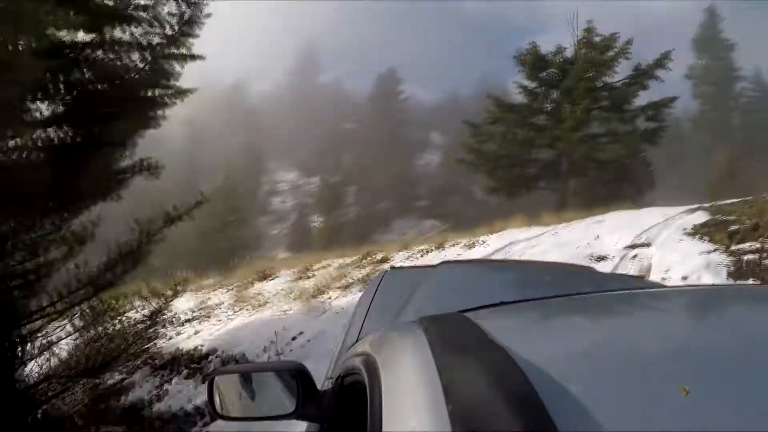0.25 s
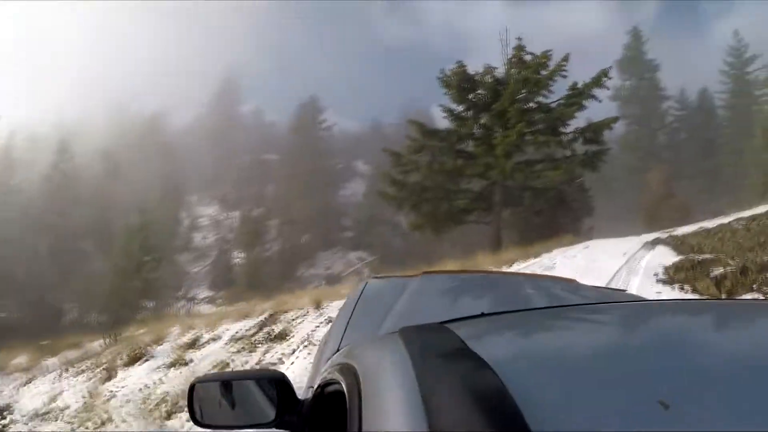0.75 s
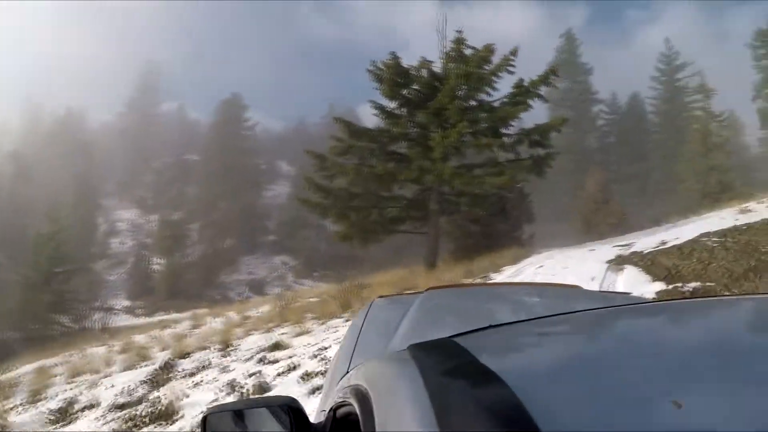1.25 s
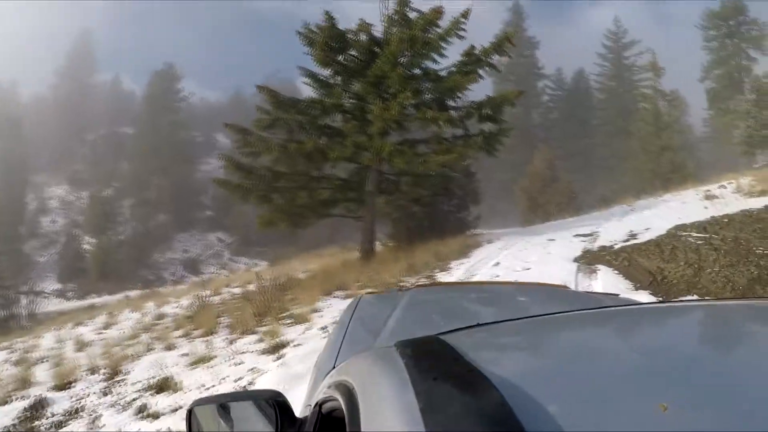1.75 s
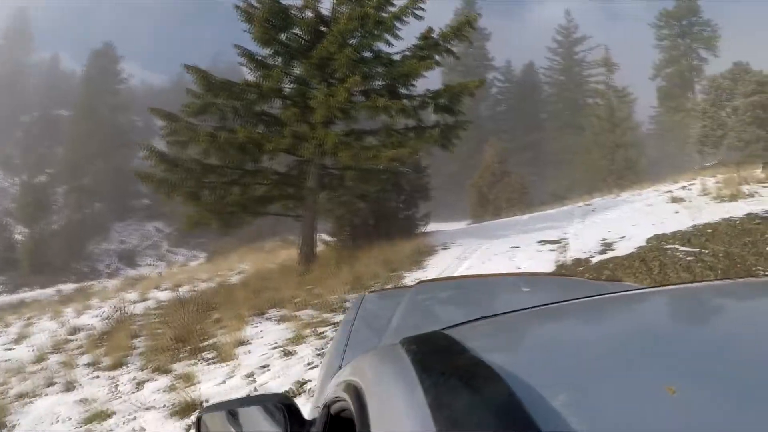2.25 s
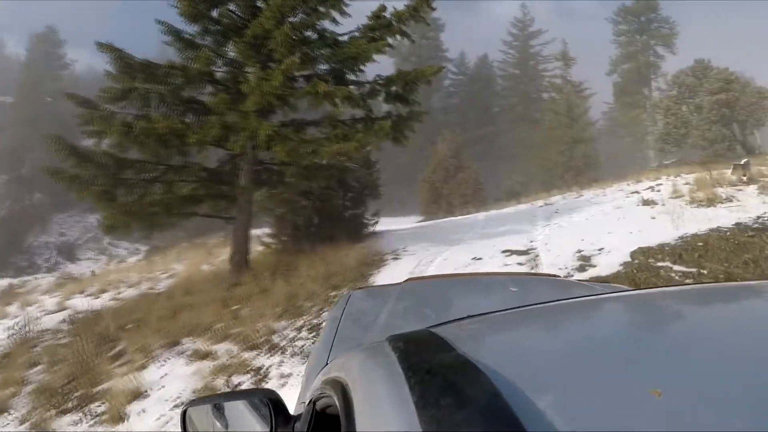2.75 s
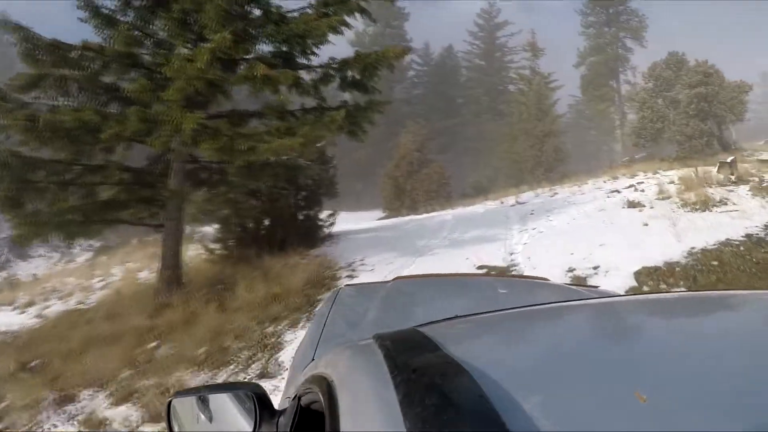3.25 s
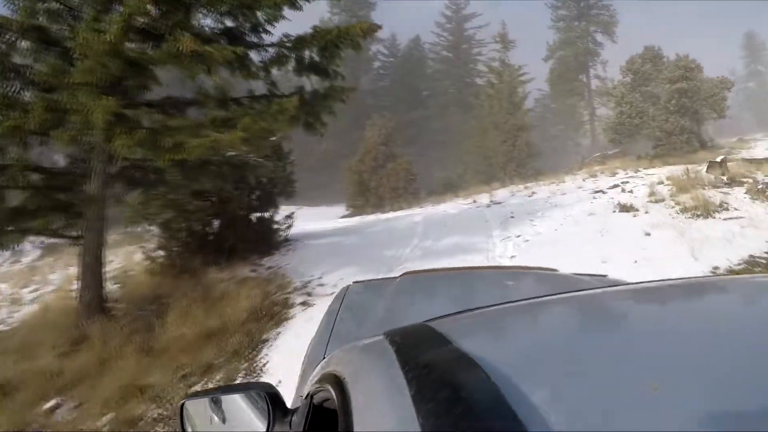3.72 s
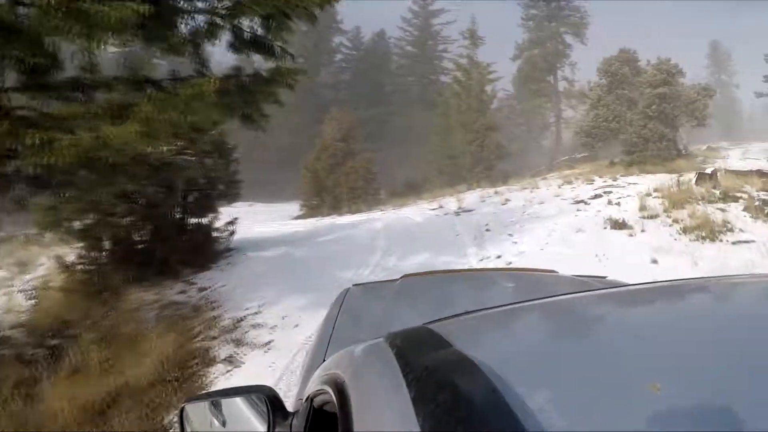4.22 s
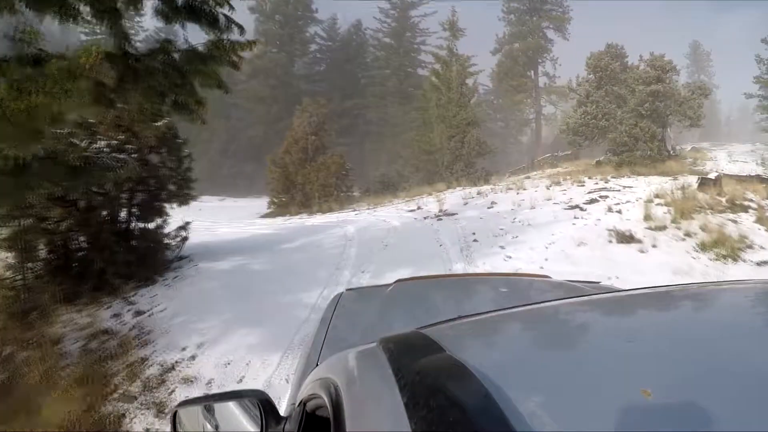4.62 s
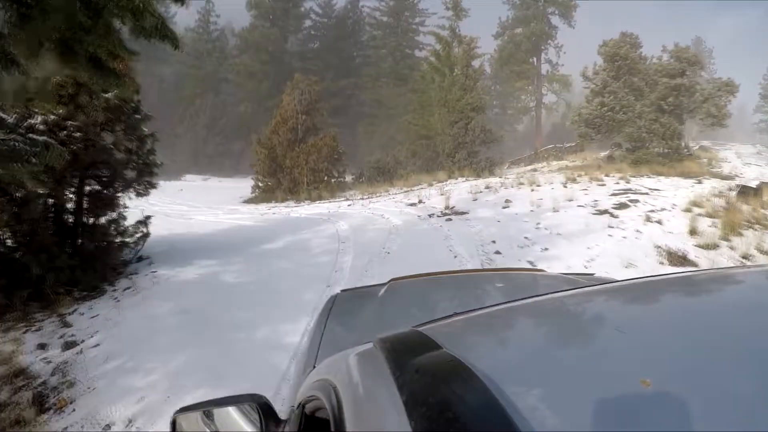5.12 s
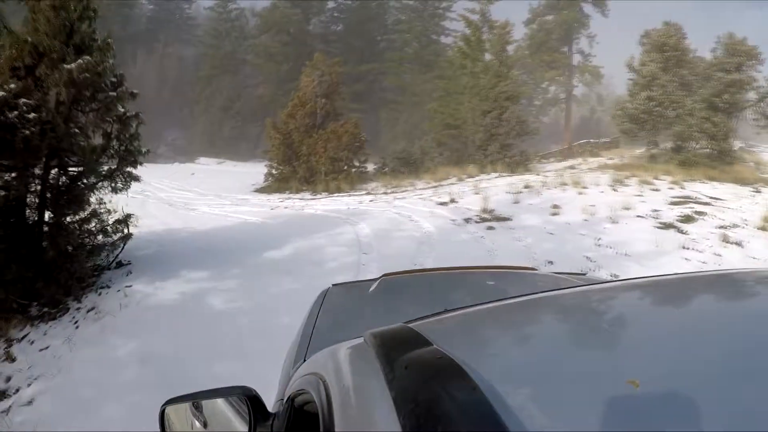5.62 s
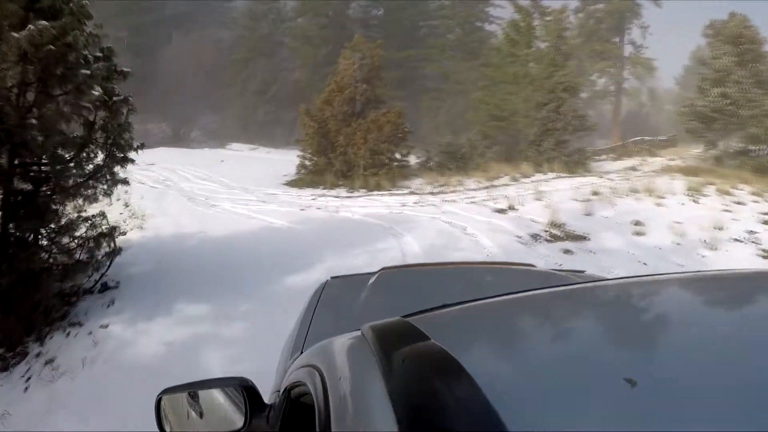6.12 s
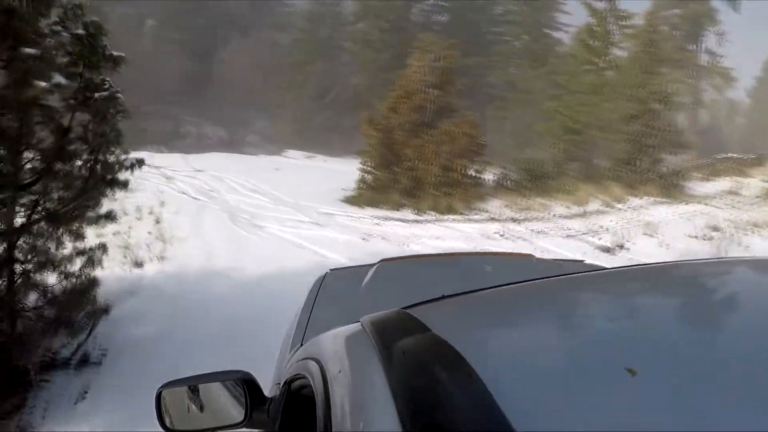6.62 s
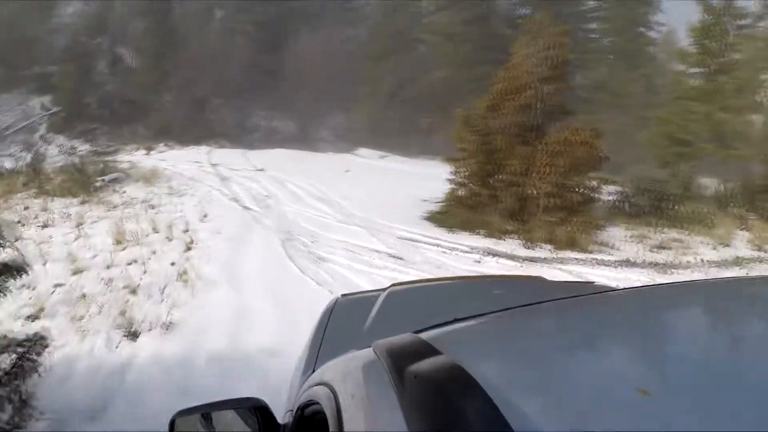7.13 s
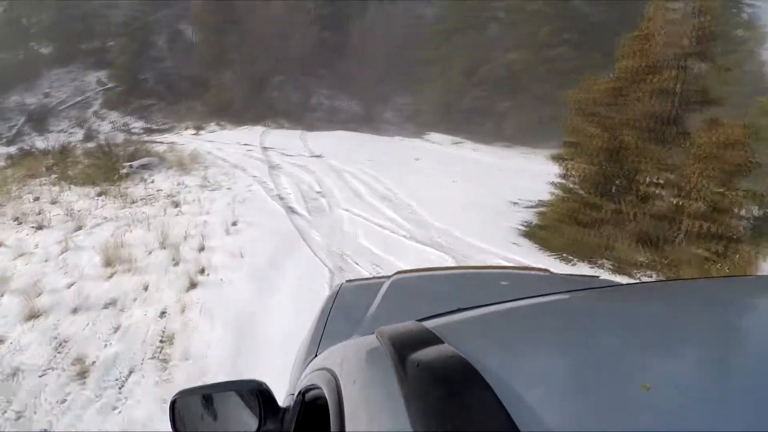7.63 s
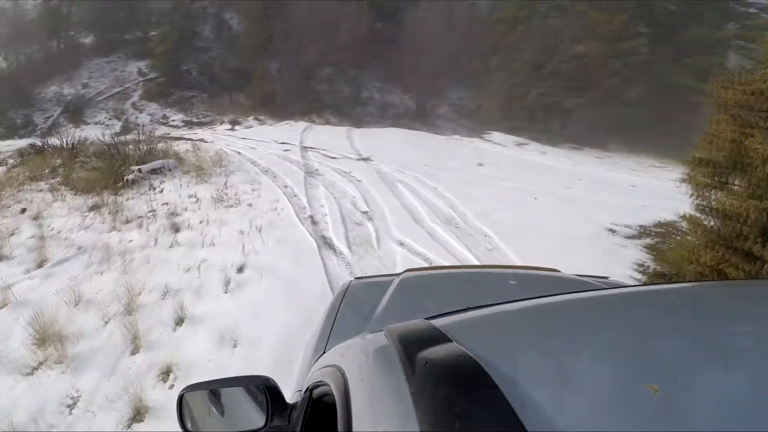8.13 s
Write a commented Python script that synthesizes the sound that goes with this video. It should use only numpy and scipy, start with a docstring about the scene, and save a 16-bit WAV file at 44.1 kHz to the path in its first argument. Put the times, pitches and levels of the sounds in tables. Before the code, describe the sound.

A car climbs a rough, snow-covered track, heard close up from a microphone on its roof. The exhaust throbs low while the body rumbles and booms over ruts, tyres crunch snow and air hisses past. The suspension knocks irregularly and bits of grit tick on the panels. After a calmer middle stretch the engine pulls harder and rises in pitch, then eases off amid more knocks and a faint thin whistle.

```python
"""A car climbs a rough, snowy track, heard close up from a small camera's microphone on its roof.
From the start the exhaust throbs with each firing, the body rumbles over ruts and booms in swells,
tyres crunch snow, air and spray hiss past and the suspension knocks. Grit starts ticking on the panels
near 1 s; icy crust crackles from about 2 to 3 s. At 6 s the engine pulls hard and air rushes in its
intake; from 7 s a thin whistle falls as the car slows."""
import sys
import numpy as np
from scipy import signal
from scipy.fft import rfft, irfft, next_fast_len
from scipy.io import wavfile
from scipy.ndimage import uniform_filter1d, map_coordinates

SR = 44100
rng = np.random.default_rng(int(sys.argv[2]) if len(sys.argv) > 2 else 0)


def generate_wav(sig):
    """Save sig (samples, or channels by samples) to the path in sys.argv[1] as 16-bit PCM at SR."""
    pcm = np.round(np.clip(np.atleast_2d(sig).T, -1, 1) * 32767).astype(np.int16)
    wavfile.write(sys.argv[1], SR, pcm)


N = 369116

# engine speed: time_s, firing_hz
ENGINE_SPEED = [(0, 48.2), (.09, 47.8), (.37, 51.5), (.79, 44.6), (1.02, 51.6), (1.33, 43.6), (1.56, 34.6),
                (1.75, 35), (1.91, 29.6), (2.12, 31.4), (2.33, 35.8), (2.56, 29.8), (3.01, 33.5),
                (3.28, 33.3), (3.66, 37.6), (3.82, 36.5), (4.05, 38.1), (4.17, 40.8), (4.34, 39.4),
                (4.5, 40), (4.92, 35.8), (5.29, 37.9), (5.59, 34.8), (5.78, 36.4), (5.9, 35.9),
                (6.08, 39.3), (6.45, 48.5), (6.67, 56.5), (6.95, 59), (7.39, 64), (7.78, 57.8), (8, 44.8),
                (8.37, 43.7)]
# engine load: time_s, firing_tone_db, octave_db, upper_overtones_db, pipe_ring_db
ENGINE_LOAD = [(0, -30, -33, -36, 0), (.3, -30, -34, -41, 0), (.55, -28, -28, -35, -7),
               (.75, -26, -31, -31, -9), (.95, -26, -27, -35, -8), (1.15, -28, -33, -42, 0),
               (1.45, -32, -34, -42, 0), (1.65, -24, -19, -37, 0), (1.9, -25, -23, -34, 0),
               (2.3, -26, -25, -32, 0), (2.6, -26, -28, -34, 0), (2.9, -26, -26, -31, 0),
               (3.4, -25, -25, -34, 2), (3.7, -24, -23, -38, 0), (4.05, -24, -23, -35, 0),
               (4.16, -23, -18, -33, 5), (4.3, -21, -25, -35, 4), (4.75, -23, -25, -37, 2),
               (4.95, -25, -27, -41, 0), (5.25, -28, -35, -41, 0), (5.5, -28, -26, -37, 0),
               (5.9, -22, -21, -35, 0), (6.08, -24, -19, -27, 7), (6.25, -23, -17, -28, 12),
               (6.45, -21, -18, -27, 13), (6.6, -19, -18, -25, 5), (6.72, -19, -21, -31, 3),
               (6.85, -23, -31, -39, 0), (7.35, -23, -29, -38, 0), (7.7, -24, -35, -40, 0),
               (8.1, -28, -33, -36, 0), (8.37, -30, -33, -38, 0)]
# colour the exhaust gives the upper overtones: frequency_hz, gain_db
EXHAUST_COLOUR = [(90, 1), (112, -2), (130, -2), (168, -3), (186, -10), (205, -13), (230, -5), (255, -10),
                  (275, -13), (295, -12), (325, -21), (380, -13), (450, -23), (560, -17), (640, -32)]
# faint tones of the running car: pitch_hz, level_db
WHINE_TONES = [(646, -78), (3530, -76.5)]
# swells of the shell's deep boom, from ruts or from beating with the engine: peak_s, boom_db
BOOM_SWELLS = [(.07, -18.5), (.27, -21), (0.49, -26), (0.769, -14.5), (1.04, -13), (1.2, -20.5),
               (1.45, -17), (1.72, -31), (3.75, -32), (3.92, -36), (4.33, -21), (4.5, -19.5), (4.86, -25),
               (5.2, -25), (5.55, -26), (5.8, -17.5), (6.05, -17), (6.33, -17), (6.54, -17.5), (6.83, -16),
               (6.95, -22), (7.13, -43), (7.35, -25), (7.76, -24), (7.98, -32), (8.18, -25)]
# roughness of the track: time_s, rumble_db
ROUGHNESS = [(0, -28.5), (.25, -19), (.6, -21.5), (1.0, -24.5), (1.37, -16.5), (1.9, -23.5), (2.6, -30.5),
             (3.3, -29.5), (3.9, -24), (4.12, -19), (4.45, -28.5), (5.1, -20), (5.5, -24), (6.1, -24),
             (6.6, -21.5), (7.1, -14.5), (7.7, -17.5), (8.37, -20.5)]
# rumble of the shell under the microphone: frequency_hz, relative_db
RUMBLE_SPECTRUM = [(8.8, -29), (15, -0.5), (32, 1), (53, 1.5), (76, 1), (113, -3.5), (155, -14),
                   (254, -21.5), (292, -20.5), (349, -26), (400, -31.5), (520, -36.5), (880, -120)]
# tyres and air: time_s, crunch_db, hiss_db, crunch_bass_gain_db
SNOW_LEVELS = [(0, -25.5, -50, -8.5), (.65, -30.5, -51.5, -0.5), (.93, -26, -51, -8.5),
               (1.17, -24.5, -44.5, -6), (1.44, -32, -54, -9.5), (2.1, -34, -52.5, 3.5),
               (3.3, -33, -52.5, -4.5), (3.8, -31.5, -53.5, 1.5), (4.54, -30, -51, -1),
               (4.87, -32, -54, -1.5), (5.52, -35, -56, 4), (5.97, -32.5, -51.5, 4.5), (6.25, -27, -50, -2),
               (6.64, -25.5, -47, 1), (6.85, -26.5, -49.5, -2.5), (7.15, -29, -52, 4),
               (7.45, -30.5, -51.5, -2.5), (8.37, -32.5, -53.5, -0.5)]
# snow packing under the tyres: frequency_hz, relative_db
CRUNCH_SPECTRUM = [(88, -16.5), (150, -1.5), (200, -8.5), (248, -5.5), (299, -15), (361, -14), (658, -18),
                   (701, -21.5), (846, -20), (1520, -30.5), (3000, -44), (3900, -48), (6600, -120)]
# air and spray passing the roof: frequency_hz, relative_db
HISS_SPECTRUM = [(880, -46), (1500, -4.5), (1670, 0), (2170, -1.5), (2920, -6), (3310, -7), (3610, -2.5),
                 (5190, -10), (5960, -10), (7040, -18.5), (8500, -21), (11000, -34), (18700, -120)]
# knocks in the suspension and trim: start_s, ring_db, centre_hz, crack_db
KNOCK_BLOWS = [(.050, -13, 1040, -18.5), (.269, -26.5, 355, -23), (.958, -24.5, 355, -36),
               (1.058, -28, 355, -25), (1.078, -18, 850, -17), (1.097, -22.5, 355, -20),
               (1.067, -21, 610, -22), (1.088, -26, 645, -22), (1.107, -28, 900, -32),
               (1.118, -26, 560, -17), (1.128, -32, 735, -35), (1.195, -25, 500, -28),
               (1.21, -30, 475, -31), (1.225, -26, 600, -24), (1.27, -24, 355, -33),
               (1.286, -19.5, 860, -20), (1.34, -28.5, 355, -43), (1.398, -25, 552, -27),
               (1.504, -21, 473, -29), (2.225, -19, 552, -21), (2.451, -28, 820, -22),
               (2.757, -22, 500, -24), (3.285, -23, 447, -25), (3.293, -21, 505, -32),
               (3.454, -22, 423, -28), (3.778, -25, 690, -34), (4.481, -35, 265, -33),
               (4.961, -23, 475, -33), (4.97, -17.5, 266, -33), (5.095, -23, 486, -34),
               (5.895, -21, 268, -42), (6.600, -11.5, 268, -32), (6.631, -17, 637, -31),
               (7.018, -23.5, 1240, -30), (7.037, -24, 955, -26), (7.098, -22, 1180, -28),
               (7.108, -27, 1250, -35), (7.116, -26, 1100, -34), (7.128, -29, 900, -19.5),
               (7.151, -25, 420, -30), (7.159, -23, 414, -31), (7.287, -17, 1050, -22),
               (7.505, -16.5, 268, -33), (7.534, -30.5, 355, -33), (7.554, -19, 410, -22),
               (7.628, -19, 268, -26), (7.809, -17, 473, -23), (7.868, -27, 410, -23),
               (8.182, -24.5, 422, -41)]
# modes of the suspension and trim: pitch_hz, t60_s
TRIM_MODES = [(268, 0.068), (355, 0.17), (410, 0.065), (475, 0.044), (552, 0.046), (650, 0.031),
              (735, 0.053), (880, 0.05), (1090, 0.022), (1180, 0.038), (1300, 0.039)]
# crack of a knock: frequency_hz, relative_db
THUD_SPECTRUM = [(120, -16), (260, -6), (600, -14), (1300, -20.5), (2000, -32.5), (5000, -49), (9000, -120)]
# grit striking the panels: start_s, ring_db, centre_hz, crack_db
GRIT_BLOWS = [(.807, -54, 5540, -47), (1.113, -46, 6140, -39), (1.156, -30, 3650, -31.5),
              (1.501, -30.5, 2150, -37), (1.811, -46, 3750, -51), (1.935, -49, 6140, -46),
              (2.042, -50, 4200, -49), (2.053, -44, 3400, -41), (2.2, -48, 4400, -50),
              (2.561, -48, 5800, -46), (2.697, -48, 4400, -50), (2.889, -47, 6140, -47),
              (2.221, -45, 4200, -33), (2.753, -50, 3650, -36.5), (5.427, -49, 3000, -48),
              (5.708, -42, 2930, -39.5), (6.323, -36, 1820, -46), (7.109, -46, 3460, -44),
              (8.219, -42, 3700, -55)]
# modes of the panels: pitch_hz, t60_s
PANEL_MODES = [(1820, 0.05), (2190, 0.047), (2980, 0.028), (3500, 0.06), (3750, 0.026), (3950, 0.049),
               (4200, 0.048), (5540, .03), (6140, 0.044)]
# crack of grit: frequency_hz, relative_db
TICK_SPECTRUM = [(900, -36), (1800, 3), (2500, -1.5), (4200, -1), (6300, -11.5), (7600, -21), (12000, -84)]
# a stretch of icy crust: time_s, level_db
CRUST_LEVELS = [(0, -85), (1.6, -80), (1.85, -63.5), (2.95, -63.5), (3.3, -75), (8.37, -85)]
# grains of crust: frequency_hz, relative_db
CRUST_SPECTRUM = [(2000, -48), (3300, -17), (4500, -3), (6300, 3.5), (7200, -25), (11000, -65)]
# air drawn into the engine: time_s, level_db
INTAKE_LEVELS = [(0, -55), (3.6, -56), (4.3, -51), (4.9, -56), (5.8, -55), (6.15, -45), (6.9, -45),
                 (7.25, -52), (8.37, -57)]
# resonances of the air duct: frequency_hz, relative_db
INTAKE_SPECTRUM = [(800, -40), (1120, -9), (1190, 0), (1260, -8), (1310, -2), (1390, -10), (1520, 0),
                   (1660, -9), (1760, -4), (1880, -13), (2020, -18), (2130, -6), (2300, -16), (2440, -11),
                   (3200, -45)]
# whistle as the car slows: time_s, pitch_hz, level_db
WHISTLE_GLIDE = [(7.0, 2740, -85), (7.12, 2720, -63), (7.3, 2700, -69), (7.52, 2660, -63),
                 (7.85, 2600, -67), (8.05, 2500, -72), (8.15, 2690, -72), (8.37, 2650, -66)]
# the microphone's own noise: frequency_hz, relative_db
MIC_NOISE_SPECTRUM = [(3530, -7), (6000, 1.5), (8030, -3.5), (10400, -1), (13200, -13), (15000, -13)]


def amp(db):
    """Gain of a level in dB."""
    return 10 ** (np.asarray(db) / 20)


def unit_rms(x):
    """x at rms 1."""
    return x / np.sqrt(np.mean(x ** 2) + 1e-20)


def db_at(spectrum, hz):
    """Level of a spectrum at hz, interpolated on a log frequency axis."""
    points_hz, db = np.transpose(spectrum)
    return np.interp(np.log(hz + 1), np.log(points_hz + 1), db)


def curves(rows):
    """One value per sample for each column after the time."""
    time_s, *columns = np.transpose(rows)
    return [np.interp(np.arange(N) / SR, time_s, column) for column in columns]


def wobble(rate_hz):
    """A smooth random curve through rate_hz knots a second, 30 at most."""
    coarse = np.arange(0, N + 32, 32)
    knots = rng.standard_normal(int(N * 30 / SR) + 4)
    return np.interp(np.arange(N), coarse, map_coordinates(knots, [coarse * min(rate_hz, 30) / SR]))


def filtered(x, response):
    """x through a filter whose gain is response(hz)."""
    size = next_fast_len(N + SR // 2)
    return irfft(rfft(x, size) * response(np.fft.rfftfreq(size, 1 / SR)), size)[..., :N]


def grainy_noise(spectrum, patchy_db, grain_db, grains_per_s):
    """Coloured noise of rms 1 with patches of random gain and sparse spikes riding on it."""
    cells = signal.stft(rng.standard_normal(N), nperseg=512)[2]
    patches = uniform_filter1d(rng.standard_normal(cells.shape), size=6, axis=0)
    patches = uniform_filter1d(patches, size=10, axis=1)
    noise = signal.istft(cells * amp(patchy_db * unit_rms(patches)), nperseg=512)[1][:N]
    spikes = (rng.random(N) < grains_per_s / SR) * rng.laplace(size=N)
    mix = unit_rms(noise) + amp(grain_db) * unit_rms(spikes)
    return unit_rms(filtered(mix, lambda hz: amp(db_at(spectrum, hz))))


def exhaust(pipe_hz=134.5, half_width_hz=34, dull_above_hz=315, full_ring_db=13):
    """A pressure pulse per firing: overtones in step, coloured by the pipe and lifted where it rings."""
    firing_hz, = curves(ENGINE_SPEED)
    firing_db, octave_db, upper_db, ring_db = curves(ENGINE_LOAD)
    unsteady_hz = uniform_filter1d(firing_hz, size=2000) * (1 + .003 * wobble(10))
    phase = 2 * np.pi * np.cumsum(unsteady_hz) / SR
    dull_db = -8 * np.clip(1 - ring_db / full_ring_db, 0, 1)  # high overtones fade at light load
    levels_db = [firing_db, octave_db]
    for k in range(3, 14):
        hz = k * firing_hz
        lift_db = ring_db / (1 + ((hz - pipe_hz) / half_width_hz) ** 2)
        fade_db = dull_db / (1 + (dull_above_hz / hz) ** 8)
        levels_db.append(upper_db + db_at(EXHAUST_COLOUR, hz) + lift_db + fade_db)
    throb = np.zeros(N)
    for k, db in enumerate(levels_db, 1):
        gain = amp(db + (1 + .1 * k) * wobble(7))
        lag = .075 * k ** 2  # the pipe delays higher overtones, rounding the pulse
        throb += gain * np.sin(k * phase - lag + .09 * k * wobble(4))
    uneven = np.sin(phase / 2) + np.sin(3 * phase / 2)  # the cylinders differ
    return np.sqrt(2) * (throb + amp(firing_db - 21 + 3.3 * wobble(4.9)) * uneven)


def whine():
    """Thin tones of the running car drift a little and come and go."""
    t, out = np.arange(N) / SR, np.zeros(N)
    for hz, db in WHINE_TONES:
        gain = amp(db + 4 * wobble(1))
        drift_s = .0026 * np.cumsum(wobble(6.8)) / SR
        out += gain * np.sin(2 * np.pi * hz * (t + drift_s))
    return out


def body_shake(boom_hz=45, drift_hz=2.2, rise_s=.061, t60_s=.67):
    """The shell's one deep resonance swells and dies away over the lumpy rumble of the track."""
    rumble_db, = curves(ROUGHNESS)
    peak_s, peak_db = np.transpose(BOOM_SWELLS)
    coarse = np.arange(0, N, 64)
    since_peak_s = coarse / SR - peak_s[:, None]
    rise = np.exp(-(np.minimum(since_peak_s, 0) / rise_s) ** 2)
    swells = rise * amp(peak_db[:, None] - 60 * np.maximum(since_peak_s, 0) / t60_s)
    between_swells = amp(rumble_db - 9)
    boom_gain = np.interp(np.arange(N), coarse, swells.sum(axis=0)) + between_swells
    phase = 2 * np.pi * np.cumsum(boom_hz + drift_hz * wobble(8.3)) / SR
    boom = np.sqrt(2) * amp(.49 * wobble(30)) * np.sin(phase)
    lumps = amp(1.45 * wobble(16) + 1.74 * wobble(7))
    rumble = lumps * grainy_noise(RUMBLE_SPECTRUM, patchy_db=1.4, grain_db=-14, grains_per_s=85)
    return boom_gain * boom + amp(rumble_db) * unit_rms(rumble)


def tyres_on_snow(bass_below_hz=600):
    """Snow packs under the tyres in small bursts that also lift the hiss of air and spray."""
    crunch_db, hiss_db, bass_db = curves(SNOW_LEVELS)
    bursts = wobble(22)
    crunch = grainy_noise(CRUNCH_SPECTRUM, patchy_db=1.5, grain_db=-15.5, grains_per_s=220)
    crunch = unit_rms(amp(.61 * bursts) * crunch)
    bass = filtered(crunch, lambda hz: 1 / (1 + (hz / bass_below_hz) ** 4))
    flutter = amp(.34 * bursts + .17 * wobble(7.1))
    hiss = flutter * grainy_noise(HISS_SPECTRUM, patchy_db=.9, grain_db=-11, grains_per_s=340)
    return amp(crunch_db) * (crunch + (amp(bass_db) - 1) * bass) + amp(hiss_db) * unit_rms(hiss)


def strike(blows, modes, crack_spectrum, crack_t60_s, rise_s, detune, focus_db_per_octave=34):
    """Each blow rings the modes near its centre, each blurred by two neighbours, over a noisy crack."""
    out, t = np.zeros(N + SR), np.arange(SR // 10) / SR
    colour = amp(db_at(crack_spectrum, np.fft.rfftfreq(len(t), 1 / SR)))
    envelope = (1 - np.exp(-(t / rise_s) ** 2)) * (1 - (t / t[-1]) ** 4)
    mode_hz, t60_s = np.transpose(modes)[:, :, None]
    for start_s, ring_db, centre_hz, crack_db in blows:
        crack = unit_rms(irfft(rfft(rng.standard_normal(len(t))) * colour, len(t)))
        neighbour_hz = mode_hz * np.exp(detune * rng.standard_normal((2, len(mode_hz), 1)))
        tones = np.sin(2 * np.pi * mode_hz * t) + .34 * np.sin(2 * np.pi * neighbour_hz * t).sum(axis=0)
        mode_db = -focus_db_per_octave * np.abs(np.log2(mode_hz / centre_hz))
        ring = (amp(mode_db - 60 * t / t60_s) * tones).sum(axis=0)
        blow = amp(ring_db) * ring + amp(crack_db - 60 * t / crack_t60_s) * crack
        out[round(start_s * SR):][:len(t)] += envelope * blow
    return out[:N]


def suspension_knocks(rebounds=2, mean_wait_s=.03, mean_loss_db=17):
    """Suspension and trim knock; loose parts rebound more weakly, at uneven waits and nearby pitches."""
    start_s, ring_db, centre_hz, crack_db = np.transpose(KNOCK_BLOWS)[:, :, None]
    wait_draw, loss_draw, pitch_draw = rng.random((len(start_s), 3, rebounds)).swapaxes(0, 1)
    rebound_s = start_s + np.cumsum(2 * mean_wait_s * wait_draw, axis=1)
    loss_db = np.cumsum(mean_loss_db * (.5 + loss_draw), axis=1)
    rebound_columns = [rebound_s, ring_db - loss_db, centre_hz * (.5 + pitch_draw), crack_db - loss_db]
    blows = [*KNOCK_BLOWS, *np.reshape(rebound_columns, (4, -1)).T]
    return strike(blows, TRIM_MODES, THUD_SPECTRUM, crack_t60_s=.042, rise_s=.0021, detune=.09)


def grit_ticks():
    """Grit hits the panels, which ring high and briefly."""
    return strike(GRIT_BLOWS, PANEL_MODES, TICK_SPECTRUM, crack_t60_s=.06, rise_s=.001, detune=.06)


def icy_crust():
    """Icy crust crackles under the tyres in single grains."""
    level_db, = curves(CRUST_LEVELS)
    return amp(level_db) * grainy_noise(CRUST_SPECTRUM, patchy_db=5.5, grain_db=2, grains_per_s=120)


def intake():
    """Air rushes in the intake duct when the engine pulls, beating at the firing rate."""
    (firing_hz,), (level_db,) = curves(ENGINE_SPEED), curves(INTAKE_LEVELS)
    beat = 1 + .3 * np.sin(2 * np.pi * np.cumsum(firing_hz) / SR)
    air = grainy_noise(INTAKE_SPECTRUM, patchy_db=1.5, grain_db=-11.5, grains_per_s=450)
    return amp(level_db) * beat * air


def whistle():
    """A faint, unsteady whistle, perhaps the brakes."""
    pitch_hz, level_db = curves(WHISTLE_GLIDE)
    gain = amp(level_db + 3 * wobble(9))
    phase = 2 * np.pi * np.cumsum(pitch_hz * (1 + .003 * wobble(25))) / SR
    return np.sqrt(2) * gain * np.sin(phase)


def scene():
    """All sources reach the one microphone on the roof."""
    impacts = grit_ticks() + suspension_knocks()
    machinery = exhaust() + intake() + whistle() + whine()
    track = body_shake() + tyres_on_snow() + icy_crust()
    return (impacts + machinery + track)[None]


def record(dry, ceiling=.64, fade_s=.002, stopband_hz=15465):
    """The camera's microphone adds faint noise; loud peaks are rounded and the top treble is cut."""
    x = dry + amp(-63.5) * grainy_noise(MIC_NOISE_SPECTRUM, patchy_db=1, grain_db=-25, grains_per_s=330)
    x = x / (1 + np.abs(x / ceiling) ** 4) ** (1 / 4)
    from_edge_s = np.minimum(np.arange(N), np.arange(N)[::-1]) / SR
    x = x * np.minimum(1, from_edge_s / fade_s)  # opens and closes without a click
    return signal.sosfiltfilt(signal.cheby2(14, 45, stopband_hz, fs=SR, output="sos"), x)


dry = scene()
out = record(dry)
generate_wav(out)
```